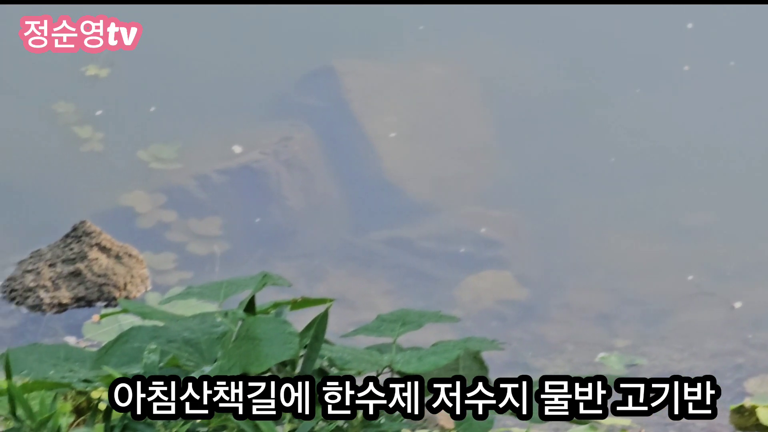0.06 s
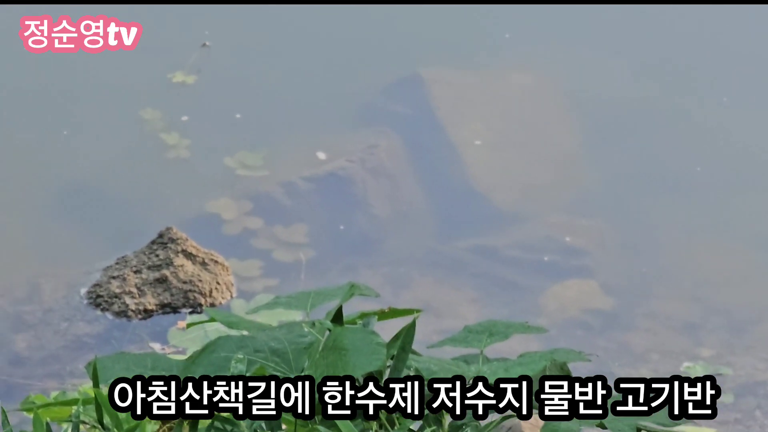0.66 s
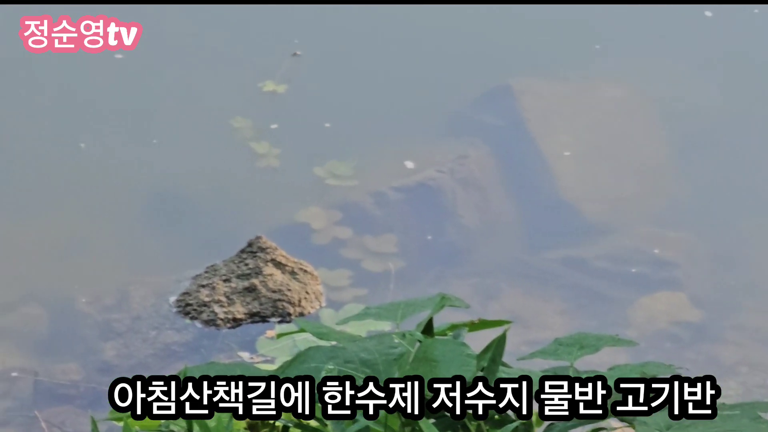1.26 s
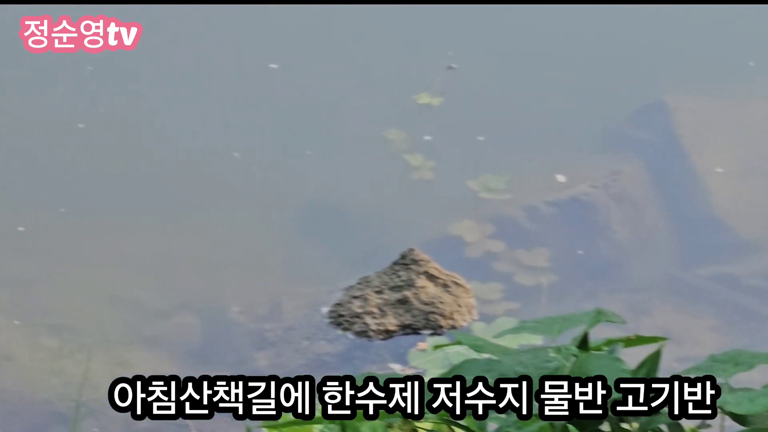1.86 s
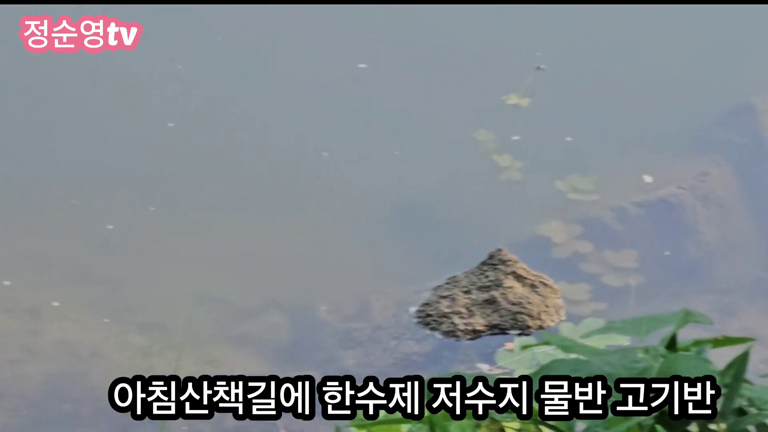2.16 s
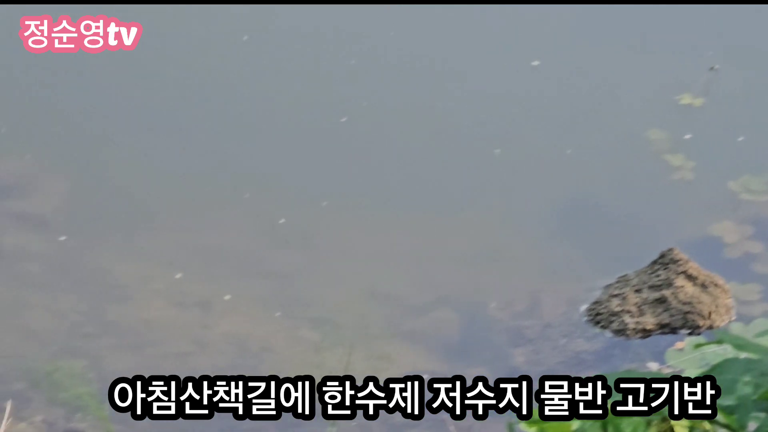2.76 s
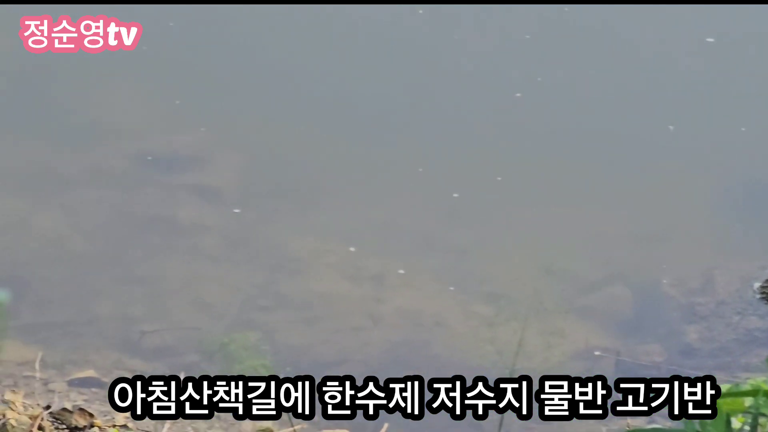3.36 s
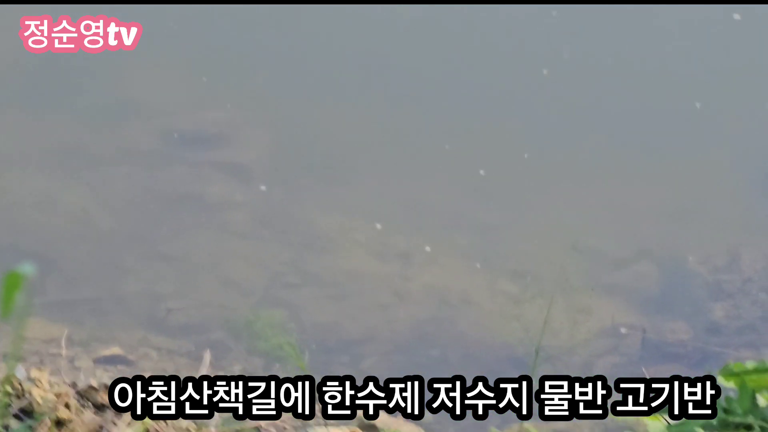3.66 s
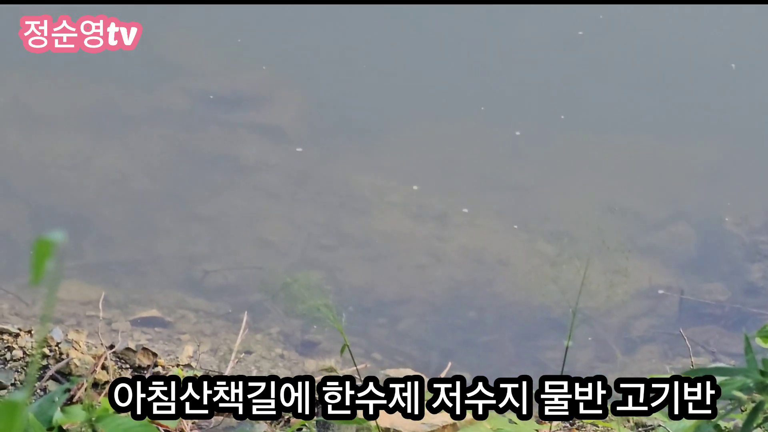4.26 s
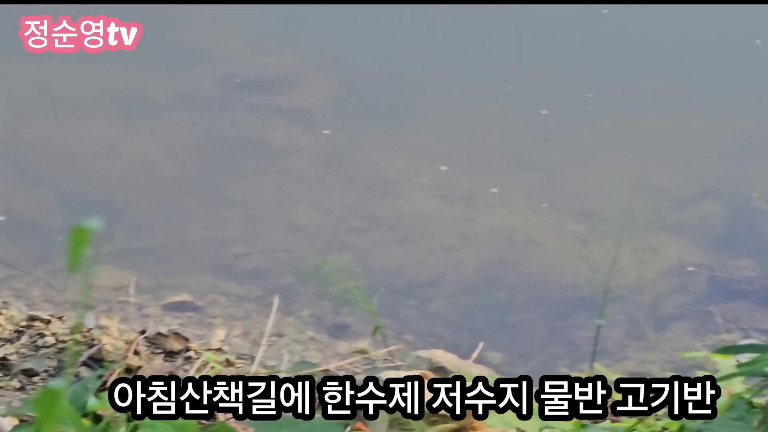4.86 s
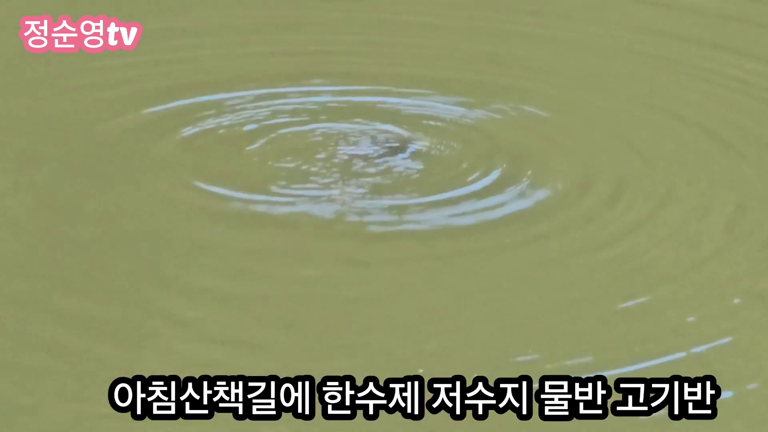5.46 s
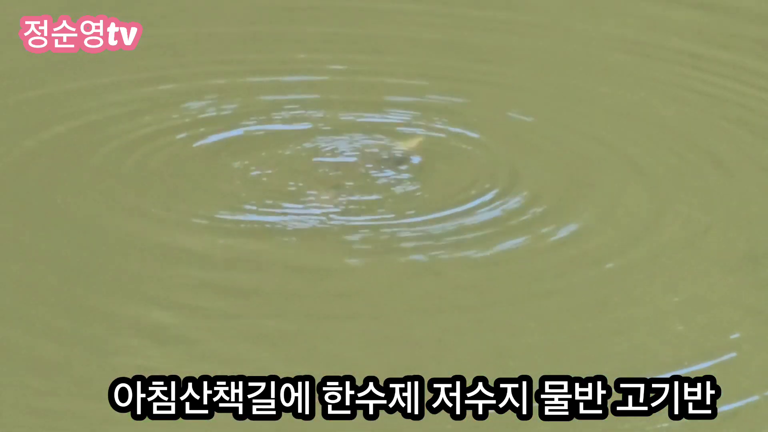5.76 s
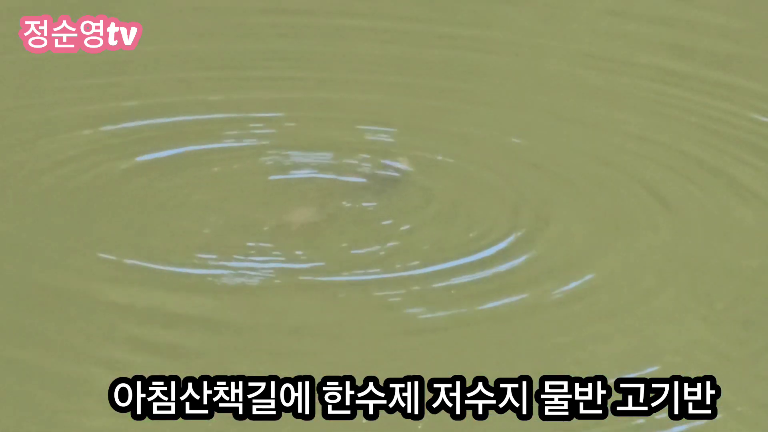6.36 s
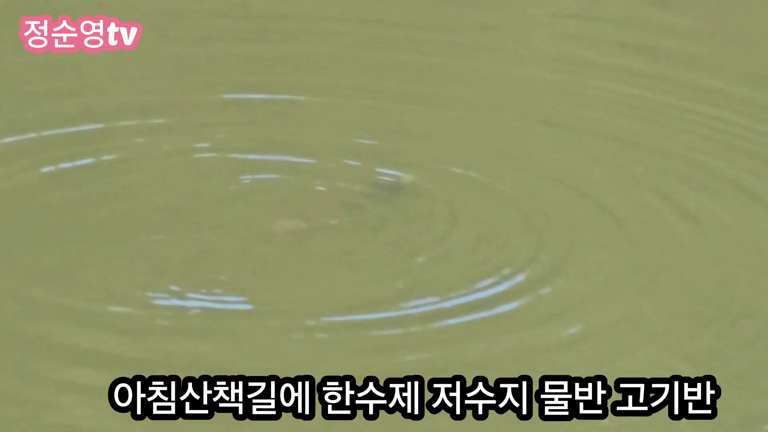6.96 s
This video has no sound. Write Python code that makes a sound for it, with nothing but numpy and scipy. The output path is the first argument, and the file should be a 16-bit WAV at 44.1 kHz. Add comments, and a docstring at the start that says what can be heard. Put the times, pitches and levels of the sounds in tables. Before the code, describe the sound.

A quiet, continuous cricket chorus fills the grass beside still water, one close cricket pulsing about three times a second above a low traffic hum. Midway come a short, thin bird call and a few soft plops. A tiny gap and a click lead to a second spot, where other crickets answer each other, distant hoots and whistles sound faintly, and the rumble and wind on the microphone are a little stronger.

```python
"""Crickets on the bank of a pond, heard from two spots in turn, with a short silence and a click between.
A few near crickets stand out of a wide chorus in the grass; each wing stroke is a short falling tone.
Birds call briefly, bubbles plop, leaves rustle, and faint hoots and whistles come from far off.
Distant traffic rumbles and hums underneath; light wind on the microphone grows at the end."""
import sys
import numpy as np
from scipy import signal
from scipy.fft import rfft, irfft
from scipy.io import wavfile
from scipy.ndimage import uniform_filter1d

SR = 44100
rng = np.random.default_rng(int(sys.argv[2]) if len(sys.argv) > 2 else 0)


def persist_wave(psi):
    """Save psi, clipped to +-1, as 16-bit WAV."""
    counts = np.round(np.clip(psi, -1, 1) * 32767).astype(np.int16)
    wavfile.write(sys.argv[1], SR, np.atleast_2d(counts).T)


N = 317520
TIME_S = np.arange(N) / SR
FIRST_SPOT_S, SECOND_SPOT_S = (-1, 5.081), (5.136, 8)

# Cricket chirps. Each row: time of the last stroke in seconds, level in dB, stroke count.
STEADY_CHIRPS = [(.184, -48.5, 6), (.496, -49, 5), (.829, -48.5, 7), (1.16, -49, 6), (1.482, -48.5, 6),
                 (1.834, -50.5, 7), (2.12, -52, 6), (2.458, -52, 7), (2.76, -53, 6), (3.092, -52, 7),
                 (3.411, -52, 6), (3.741, -52, 6), (4.073, -51.5, 6), (4.39, -53, 5), (4.72, -52, 6),
                 (5.019, -54, 6)]  # about three a second
MIDDLE_CHIRPS = [(.06, -51, 4), (.585, -54, 3), (1.12, -51, 5), (1.585, -52, 3), (1.92, -51, 3),
                 (2.98, -53, 4), (3.285, -52, 3), (3.55, -53, 5), (3.745, -49, 3), (4.6, -54, 5),
                 (5.02, -58, 3)]
TINY_CHIRPS = [(1.09, -71, 8), (1.34, -73, 7), (2.75, -76, 8), (4.27, -73, 7), (4.54, -71, 7),
               (4.79, -72, 7)]
DEEP_CHIRPS = [(5.178, -46.5, 3), (5.432, -43.5, 7), (5.712, -45, 5), (6.03, -43, 5), (6.342, -42.5, 4),
               (6.64, -48, 7), (6.89, -48.5, 4), (7.185, -50, 5)]
ANSWER_CHIRPS = [(5.52, -47, 4), (5.79, -46, 4), (5.91, -48, 3), (6.19, -53, 4), (6.29, -53, 3),
                 (6.83, -53, 3), (7.02, -52, 4)]  # a farther cricket answers the deep one
LOW_CHIRPS = [(5.2, -54, 3), (5.55, -55, 5), (5.76, -51.5, 4), (6.0, -54.5, 3), (6.176, -55.5, 5),
              (6.474, -54.5, 5), (7.04, -57, 5)]
SHRILL_CHIRPS = [(5.557, -42.5, 1), (5.722, -41, 4), (5.890, -39, 4), (6.062, -39, 4), (6.229, -38.5, 4),
                 (6.405, -39, 4)]
# Fainter crickets. Each row: start in seconds, repeat in seconds, pitch in Hz, level in dB, pan in dB.
NEIGHBOUR_SONGS = [(.02, .29, 4430, -61, -4), (.2, .32, 3496, -61.5, -1)]
# Chorus spectrum at each spot. Each row: frequency in Hz, gain in dB.
CHORUS_EQ_FIRST = [(3000, -32), (3400, -16), (3700, -6.5), (4000, -6.5), (4350, 0), (4700, 0.5), (5000, -2),
                   (5300, -5.5), (5600, -19), (6000, -37)]
CHORUS_EQ_SECOND = [(2750, -27.5), (3100, -3), (3500, 6), (3750, 3), (4000, -3.5), (4400, 3.5),
                    (4900, -4.5), (5300, -8.5), (5700, -21), (6000, -13)]
# Gliding tones. Each row: start and length in seconds, start and end pitch in Hz, level in dB.
BIRD_NOTES = [(2.785, 0.062, 3000, 3470, -69), (2.872, 0.035, 3150, 3000, -67),
              (2.928, 0.0057, 2960, 3100, -56), (2.99, 0.042, 3100, 3130, -66),
              (4.3, 0.061, 3750, 3330, -58.5)]
BUBBLES = [(2.932, 0.0215, 820, 1180, -59), (2.96, .035, 1250, 1550, -73), (3.013, 0.0099, 1500, 1650, -61),
           (3.016, 0.016, 1870, 1980, -57), (3.037, 0.02, 1820, 1950, -66), (3.057, 0.016, 1020, 1370, -65)]
# Far calls. Each row: start and length in seconds, pitch in Hz, level in dB.
HOOT_NOTES = [(5.42, 0.13, 468, -56), (5.74, 0.086, 437, -59), (5.85, 0.15, 445, -56),
              (5.92, 0.17, 520, -60.5), (6.44, 0.18, 515, -63), (6.6, 0.18, 506, -61.5)]
WHISTLE_NOTES = [(5.63, .2, 1740, -73), (5.85, 0.14, 1710, -71), (5.99, 0.13, 1910, -74),
                 (6.02, .15, 1530, -73), (6.2, 0.21, 1510, -70.5), (6.21, .17, 1895, -70),
                 (6.42, 0.43, 1703, -74), (6.82, 0.38, 1718, -73)]
# Leaf rustles. Each row: start and length in seconds, level in dB.
LEAF_RUSTLES = [(1.826, 0.2, -72.5), (2.06, 0.14, -68.5), (2.21, 0.27, -68.5), (2.554, 0.18, -63.5),
                (5.058, 0.05, -60.5)]
# Dry ticks and, at 5.136 s, a click as the sound returns after the silence.
# Each row: start in seconds, level in dB, body relative to the snap in dB.
CLICKS = [(4.925, -70, 17), (5.136, -50.5, 8.5), (6.658, -60, -14), (7.093, -53, 7)]
# Hiss spectrum at each spot. Each row: frequency in Hz, gain in dB.
HISS_EQ_FIRST = [(2000, -2.5), (3000, -9), (6000, 5), (7000, 0.5), (7500, 0.5), (9200, 0.5), (10200, -22),
                 (11400, -6), (12200, -13), (15500, -9.5)]
HISS_EQ_SECOND = [(2000, -35), (3000, -3.5), (6000, -0.5), (7400, 2.5), (8100, -11), (9500, -14.5),
                  (11200, 0), (12200, -14), (14500, -5), (15500, -6)]
# High insect hiss that swells with the deep cricket's chirps. Each row: time in seconds, gain in dB.
SCRAPE_ENVELOPE = [(5.15, -1), (5.25, -4), (5.3, -1), (5.62, 1), (5.71, 2.5), (5.8, -.5), (5.92, -.5),
                   (6.02, 4.5), (6.1, 1.5), (6.38, 1.5), (6.46, 0), (6.55, -3.5), (6.66, 4), (6.74, -2),
                   (6.91, -5), (6.97, 2), (7.04, -2), (7.19, 0)]
# Traffic spectrum at each spot. Each row: frequency in Hz, gain in dB.
RUMBLE_EQ_FIRST = [(30, -9), (70, -5), (115, -0.5), (160, -8), (230, -6), (310, -17.5), (400, -21),
                   (530, -26.5), (680, -35), (1000, -40.5), (1800, -48), (2600, -75), (4000, -67)]
RUMBLE_EQ_SECOND = [(30, -14), (70, -13.5), (105, -2.5), (155, -11.5), (235, -8.5), (310, -23.5),
                    (380, -24), (560, -37.5), (760, -37), (950, -45.5), (1800, -45.5), (2600, -57),
                    (4000, -64.5)]
# Stereo width of the traffic. Each row: frequency in Hz, side minus mid in dB.
RUMBLE_WIDTH_FIRST = [(60, -9), (200, -10), (380, -5), (700, 2), (1300, 4), (2400, -8)]
RUMBLE_WIDTH_SECOND = [(60, -16), (200, -25), (380, -5), (700, -0.5), (1300, -2), (2400, -0.5)]
# Engine tones at each spot. Each row: frequency in Hz, level in dB.
ENGINES_FIRST = [(114.5, -57), (342.6, -66.5)]
ENGINES_SECOND = [(65, -45), (194, -53.5), (349, -61.5)]
# Swells of traffic and wind. Each row: peak time and length in seconds, level in dB.
TRAFFIC_SURGES = [(0.432, 0.17, -46), (1.261, 0.12, -47), (1.672, 0.18, -53), (4.365, 0.17, -50.5),
                  (4.553, 0.1, -48.5), (4.87, 0.096, -47), (6.115, 0.26, -41), (6.58, 0.12, -41.5),
                  (7.058, 0.19, -41.5)]
WIND_GUSTS = [(0.247, 0.23, -41), (0.993, 0.17, -43.5), (1.604, 0.22, -44.5), (3.703, 0.15, -41),
              (4.24, 0.26, -44), (5.725, 0.39, -38.5), (6.4, 0.23, -33), (6.78, 0.82, -36.5)]
# Spectrum of wind on the microphone. Each row: frequency in Hz, gain in dB.
WIND_EQ = [(10, -26), (22, -1.5), (40, -10.5), (58, 5.5), (75, -6.5), (110, -26), (300, -54), (1000, -100)]


def wing_stroke(hz, fall, length_s, harmonics_db=(-60, -60), wing_width=.056):
    """The scraper slows along the file, so the tone sags and slips off the wing's resonance."""
    progress = np.linspace(0, 1, int(length_s * SR))
    sag = fall * (1 / 6 - progress ** 2)
    phase = 2 * np.pi * (np.cumsum(hz * (1 + sag)) / SR + rng.random())
    ring = np.sin(np.pi * progress) / np.sqrt(1 + (sag / wing_width) ** 2)
    second, third = undb(harmonics_db)
    return ring * (np.sin(phase) + second * np.sin(2 * phase) + third * np.sin(3 * phase))


def cricket(chirps, hz, fall, length_s, period_s, onset_db, uneven_db, harmonics_db, wing_width=.04):
    """Chirps of evenly spaced wing strokes, no two alike; the onset_db offset halves with each stroke."""
    out = np.zeros(N)
    for last_s, db, count in chirps:
        for k in range(count):
            detune, force, drag = rng.standard_normal(3)
            stroke_hz = hz * (1 + .0071 * detune)
            tone = wing_stroke(stroke_hz, fall * np.exp(.15 * drag), length_s, harmonics_db, wing_width)
            resonance_s = last_s - (count - 1 - k) * period_s
            gain = undb(db + onset_db / 2 ** k + uneven_db * force)
            add(out, resonance_s - length_s / np.sqrt(6), tone * gain)
    return out


def neighbours(period_s=.021):
    """Crickets a little farther off, each on its own beat, often dropping the seventh stroke."""
    out = 0
    for start_s, repeat_s, hz, db, pan_db in NEIGHBOUR_SONGS:
        starts_s = np.arange(start_s, N / SR, repeat_s)
        counts = 7 - (rng.random(len(starts_s)) < .5)
        chirps = [(s + (count - 1) * period_s, db, count) for s, count in zip(starts_s, counts)]
        song = cricket(chirps, hz, fall=.089, length_s=.012, period_s=period_s,
                       onset_db=2, uneven_db=4, harmonics_db=(-29, -40))
        out += place(song, pan_db, lag_ms=0, wet_db=-5.5, t60_s=.11)
    return out


def chorus(eq, db, wet_db, t60_s, pan_db, count=84, ear_lag_s=.0005, ear_shade_db=3):
    """Many far crickets, each with its own pitch, pace and direction, blurred by echoes."""
    out = np.zeros((2, N))
    for hz in np.linspace(2850, 5900, count):
        offset, pace, spacing, side = rng.random(4)
        period_s, repeat_s = .017 + .008 * spacing, .2 + .13 * pace
        bearing = 2 * side - 1
        lag, shade_db = round(bearing * ear_lag_s * SR), bearing * ear_shade_db
        for chirp_s in np.arange(-offset * repeat_s - repeat_s, N / SR, repeat_s):
            chirp_hz = hz * (1 + .012 * rng.standard_normal())
            tone = np.sqrt(repeat_s) * wing_stroke(chirp_hz, fall=.16, length_s=.01178)
            ears = np.array([np.roll(tone, lag) * undb(-shade_db / 2), tone * undb(shade_db / 2)])
            for stroke_s in chirp_s + period_s * (np.arange(8) + .04 * rng.standard_normal(8)):
                add(out, stroke_s, ears)
    left, right = colour(out + undb(wet_db) * scatter(out, t60_s), eq)
    return np.array([level(left, db + pan_db / 2), level(right, db - pan_db / 2)])


def bush_cricket(start_s, hz, period_s, length_s, db):
    """Single wing strokes make a very high, faint, even ticking."""
    out = np.zeros(N)
    for s in np.arange(start_s, N / SR, period_s):
        add(out, s, undb(db + rng.standard_normal()) * wing_stroke(hz, fall=.035, length_s=length_s))
    return out


def first_insects():
    """A steady cricket, a higher one, a tiny one and their neighbours in a dense chorus."""
    steady = cricket(STEADY_CHIRPS, hz=3813, fall=.072, length_s=.0135, period_s=.0224,
                     onset_db=-4.5, uneven_db=.5, harmonics_db=(-22, -26))
    middle = cricket(MIDDLE_CHIRPS, hz=4416, fall=.072, length_s=.014, period_s=.02,
                     onset_db=-.5, uneven_db=0, harmonics_db=(-37, -42))
    tiny = cricket(TINY_CHIRPS, hz=8600, fall=.13, length_s=.012, period_s=.016,
                   onset_db=2, uneven_db=.5, harmonics_db=(-60, -60), wing_width=.064)
    return (place(steady, pan_db=.5, lag_ms=.03, wet_db=-12, t60_s=.12)
            + place(tiny, pan_db=7, lag_ms=0, wet_db=1, t60_s=.35)
            + place(middle, pan_db=1, lag_ms=0, wet_db=1, t60_s=.12)
            + neighbours()
            + chorus(CHORUS_EQ_FIRST, db=-51, wet_db=0, t60_s=.97, pan_db=1.7)
            + hiss(HISS_EQ_FIRST, db=-67, flicker_db=.27))


def second_insects():
    """Four crickets and a bush cricket over a deeper chorus; hiss swells with the deep one's chirps."""
    deep = cricket(DEEP_CHIRPS, hz=3605, fall=.125, length_s=.0155, period_s=.0232,
                   onset_db=-2, uneven_db=1, harmonics_db=(-34.5, -38), wing_width=.05)
    answer = cricket(ANSWER_CHIRPS, hz=3620, fall=.08, length_s=.016, period_s=.021,
                     onset_db=-1.5, uneven_db=1.5, harmonics_db=(-34, -38))
    pair = place(deep, pan_db=7.5, lag_ms=.02, wet_db=3, t60_s=.26) + scatter(answer, t60_s=.3)
    low = cricket(LOW_CHIRPS, hz=3330, fall=.086, length_s=.02, period_s=.0238,
                  onset_db=-4, uneven_db=3, harmonics_db=(-27, -38))
    shrill = cricket(SHRILL_CHIRPS, hz=5370, fall=.2, length_s=.0115, period_s=.0171,
                     onset_db=-3, uneven_db=.7, harmonics_db=(-40, -42), wing_width=.045)
    shrill = place(shrill, pan_db=-7, lag_ms=.045, wet_db=-4.5, t60_s=.22)
    ticking = bush_cricket(start_s=5.1705, hz=15480, period_s=.0499, length_s=.012, db=-76.5)
    scrape_hiss = hiss(HISS_EQ_SECOND, db=-69.5, flicker_db=.5)
    scrape_hiss *= undb(np.interp(TIME_S, *np.transpose(SCRAPE_ENVELOPE)))
    return (pair + shrill + ticking + scrape_hiss
            + place(low, pan_db=1, lag_ms=0, wet_db=1.5, t60_s=.14)
            + chorus(CHORUS_EQ_SECOND, db=-49.5, wet_db=1.5, t60_s=.41, pan_db=1))


def buzz_call(start_s, length_s, hz, sweep_hz, trill_hz, fade_db, db):
    """A bird's thin tone, flicked upward fast and unevenly, weaker at the top of each flick."""
    n, out = int(length_s * SR), np.zeros(N)
    turns = np.cumsum(trill_hz * (1 + .08 * walk(100)[:n])) / SR
    flick = np.sin(np.pi * turns) ** 2
    pitch_hz = hz + sweep_hz * flick + 170 * walk(700)[:n]
    add(out, start_s, undb(db + fade_db * flick) * np.hanning(n) * sine(pitch_hz))
    return out


def birds():
    """One high buzz and a few soft, far notes."""
    buzz = buzz_call(start_s=2.789, length_s=.225, hz=7550, sweep_hz=1085, trill_hz=130.7,
                     fade_db=-10.5, db=-46)
    echoes = scatter(buzz, t60_s=.58)
    warble = glides(BIRD_NOTES, waver_hz=50, flutter_hz=300)
    return echoes + place(warble, pan_db=-11, lag_ms=-.05, wet_db=0, t60_s=.22)


def far_calls(sag=.017):
    """Faint hoots and thin, broken whistles, each falling slightly in pitch."""
    def sagging(notes):
        return [(start_s, length_s, hz, hz * (1 - sag), db) for start_s, length_s, hz, db in notes]
    hoots = glides(sagging(HOOT_NOTES), waver_hz=17.5, flutter_hz=90)
    whistles = glides(sagging(WHISTLE_NOTES), waver_hz=32, flutter_hz=150) * (.7 + .6 * walk(35))
    return place(hoots + whistles, pan_db=0, lag_ms=0, wet_db=4.5, t60_s=.24)


def plops(splash_decay_s=.013, splash_db=-11):
    """Bubbles rise in pitch as they surface, each with a small splash; the water roughens the tone."""
    tones = glides(BUBBLES, waver_hz=110, flutter_hz=700) * (1 + .3 * walk(500))
    spray = np.zeros(N)
    for start_s, length_s, _, _, db in BUBBLES:
        add(spray, start_s + length_s / 4, undb(db) * np.exp(-TIME_S / splash_decay_s))
    splash = level(band(rng.standard_normal(N), 900, 2700), splash_db) * spray
    return place(tones + splash, pan_db=-2, lag_ms=-.12, wet_db=-8, t60_s=.2)


def clicks(decay_s=.0013):
    """Short noise bursts: faint dry ticks, and a click as the sound returns after the silence."""
    out = np.zeros(N)
    for start_s, db, body_db in CLICKS:
        noise = rng.standard_normal(SR // 20)
        snap = level(band(noise, 630, 16000), 0)
        body = level(band(noise, 350, 1920), body_db)
        add(out, start_s, undb(db) * (snap + body) * np.exp(-TIME_S[:len(noise)] / decay_s))
    return out


def leaves():
    """Leaves brush each other."""
    envelope = np.zeros(N)
    for start_s, length_s, db in LEAF_RUSTLES:
        add(envelope, start_s, undb(db) * np.hanning(int(length_s * SR)))
    return envelope * level(band(rng.standard_normal(N), 1760, 3300) * undb(4.3 * walk(90)), 0)


def hiss(eq, db, flicker_db):
    """High insect hiss, flickering slightly."""
    return level(colour(rng.standard_normal((2, N)), eq) * undb(flicker_db * walk(12)), db)


def traffic_rumble(eq, width, db, swell_db, pan_db, lag_ms, churn_db=2.5):
    """Far traffic swells and churns: bass alike at both ears but for a lag, the upper part diffuse."""
    mid, side = colour(rng.standard_normal((2, N)), eq)
    mid = mid + band(mid, 139, 460) * (undb(churn_db * walk(25)) - 1)
    side = colour(side, width)
    ears = stereo(mid + side, mid - side, pan_db, lag_ms)
    return ears / np.std(band(mid, 80, 600)) * undb(db + swell_db * walk(2.4))


def engine_hum(tones):
    """Tones of far engines waver and fade on their way through the air."""
    return sum(level(sine(hz + 5 * walk(20)) * undb(3 * walk(14)), db) for hz, db in tones)


def traffic_surges():
    """Passing vehicles briefly lift the low roar."""
    roar = band(band(rng.standard_normal(N), 162, 266), 162, 266)
    return place(level(roar, 0) * swells(TRAFFIC_SURGES), pan_db=-.5, lag_ms=-.27, wet_db=-24, t60_s=.27)


def wind(breeze_db=-52, flutter_db=3, side_db=-22.5):
    """A fluttering breeze and gusts buffet the microphone, nearly alike at both ports."""
    breeze = undb(breeze_db + flutter_db * walk(8.6))
    mid, side = level(colour(rng.standard_normal((2, N)), WIND_EQ), 0)
    side *= undb(side_db)
    return stereo(mid + side, mid - side, pan_db=1, lag_ms=0) * np.hypot(breeze, swells(WIND_GUSTS))


def scatter(x, t60_s):
    """Diffuse echoes from plants and bank, different at each ear."""
    t = TIME_S[:SR // 2]
    echo = rng.standard_normal((2, len(t))) * np.exp(-np.log(1000) * t / t60_s)
    echo /= np.sqrt(np.sum(echo ** 2, axis=1, keepdims=True))
    return signal.fftconvolve(np.atleast_2d(x), echo, axes=1)[:, :N]


def place(x, pan_db, lag_ms, wet_db, t60_s):
    """Direct sound plus its echoes."""
    return stereo(x, x, pan_db, lag_ms) + undb(wet_db) * scatter(x, t60_s)


def stereo(left, right, pan_db, lag_ms):
    """Left ear louder by pan_db and later by lag_ms."""
    delayed = np.roll(left, round(lag_ms * SR / 1000))
    return np.array([delayed * undb(pan_db / 2), right * undb(-pan_db / 2)])


def glides(notes, waver_hz, flutter_hz):
    """Soft gliding tones, unsteady in pitch and strength."""
    out, drift = np.zeros(N), walk(flutter_hz)
    for start_s, length_s, start_hz, end_hz, db in notes:
        start, n = int(start_s * SR), int(length_s * SR)
        hz = np.linspace(start_hz, end_hz, n) + waver_hz * np.roll(drift, -start)[:n]
        add(out, start_s, undb(db) * np.sin(np.linspace(0, np.pi, n)) * sine(hz))
    return out * undb(2 * walk(flutter_hz))


def swells(rows):
    """Envelope of half-sine humps."""
    out = np.zeros(N)
    for peak_s, length_s, db in rows:
        add(out, peak_s - length_s / 2, undb(db) * np.sin(np.linspace(0, np.pi, int(length_s * SR))))
    return out


def walk(rate_hz):
    """Smooth random drift, unit RMS."""
    hold = max(int(SR / rate_hz), 1)
    steps = np.repeat(rng.standard_normal(N // hold + 2), hold)
    return level(uniform_filter1d(uniform_filter1d(steps, hold), hold)[:N], 0)


def colour(x, eq):
    """Filter by (Hz, dB) points."""
    hz, db = np.transpose(eq)
    bins_hz = np.maximum(np.arange(N // 2 + 1) * SR / N, 1)
    return irfft(rfft(x) * undb(np.interp(np.log(bins_hz), np.log(hz), db)), N)


def band(x, lo_hz, hi_hz):
    return signal.sosfilt(signal.butter(2, [lo_hz, hi_hz], "band", fs=SR, output="sos"), x)


def sine(hz):
    return np.sin(2 * np.pi * np.cumsum(hz) / SR)


def undb(db):
    return 10 ** (np.asarray(db) / 20)


def level(x, rms_db):
    return x * undb(rms_db) / np.sqrt(np.mean(x ** 2))


def add(track, start_s, sound):
    start = int(start_s * SR)
    lo, hi = max(start, 0), min(start + sound.shape[-1], N)
    if hi > lo:
        track[..., lo:hi] += sound[..., lo - start:hi - start]


def gate(start_s, end_s):
    return uniform_filter1d(((TIME_S > start_s) & (TIME_S < end_s)).astype(float), size=64)


def scene():
    """One spot, a short silence, then the other; wind, clicks and traffic surges at both."""
    around = wind() + place(clicks() + leaves(), pan_db=2.5, lag_ms=.1, wet_db=-4, t60_s=.81)
    around += traffic_surges()
    first = first_insects() + birds()
    first += traffic_rumble(RUMBLE_EQ_FIRST, RUMBLE_WIDTH_FIRST, db=-47.5, swell_db=-.04,
                            pan_db=.9, lag_ms=.14)
    first += engine_hum(ENGINES_FIRST) + plops()
    second = second_insects() + far_calls()
    second += traffic_rumble(RUMBLE_EQ_SECOND, RUMBLE_WIDTH_SECOND, db=-42.5, swell_db=1.03,
                             pan_db=1, lag_ms=-.35)
    second += engine_hum(ENGINES_SECOND)
    return (first + around) * gate(*FIRST_SPOT_S) + (second + around) * gate(*SECOND_SPOT_S)


def record(dry):
    """The recorder cuts the top of the treble."""
    cutoff_hz = 15750
    return signal.sosfilt(signal.ellip(10, .2, 70, cutoff_hz, fs=SR, output="sos"), dry)


dry = scene()
out = record(dry)
persist_wave(out)
```